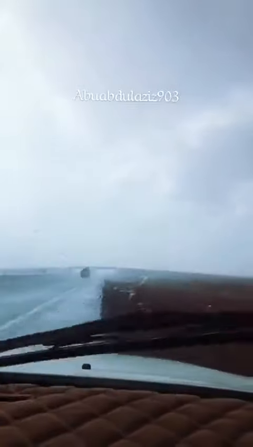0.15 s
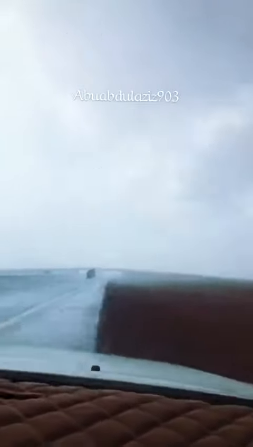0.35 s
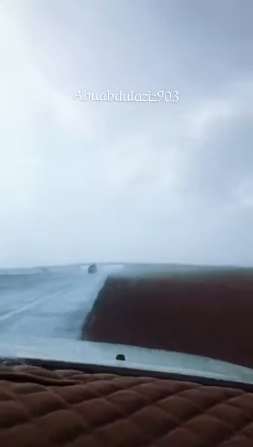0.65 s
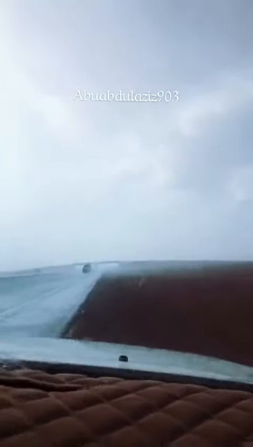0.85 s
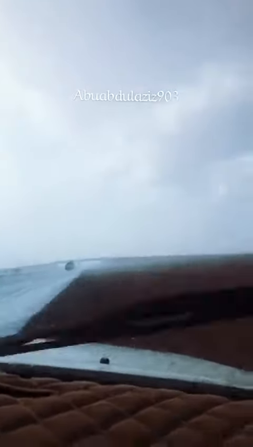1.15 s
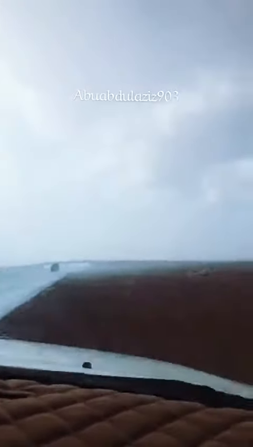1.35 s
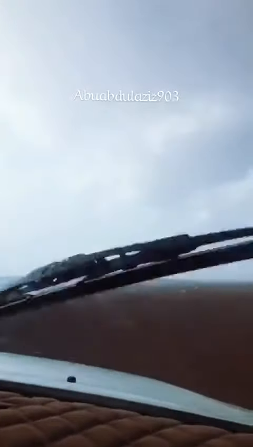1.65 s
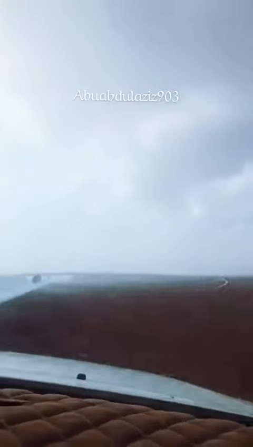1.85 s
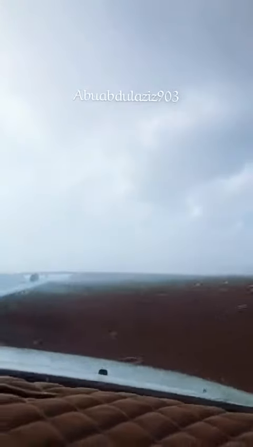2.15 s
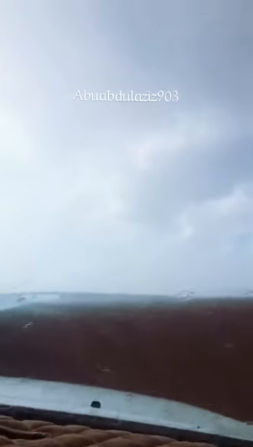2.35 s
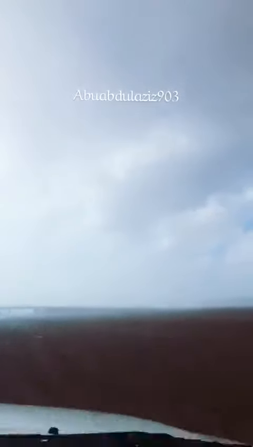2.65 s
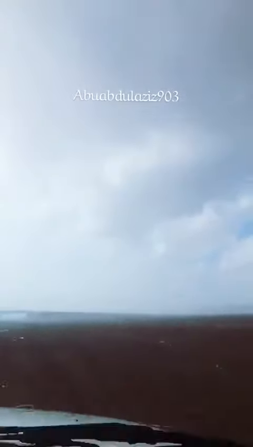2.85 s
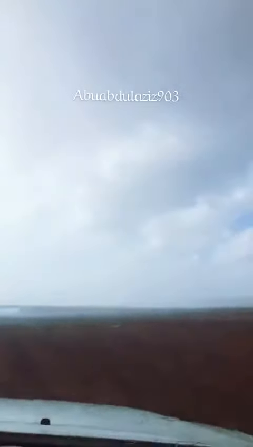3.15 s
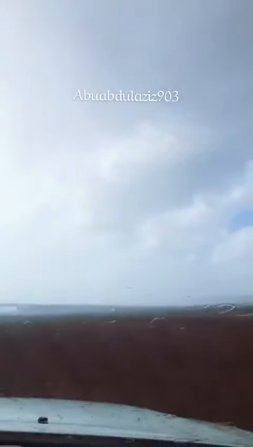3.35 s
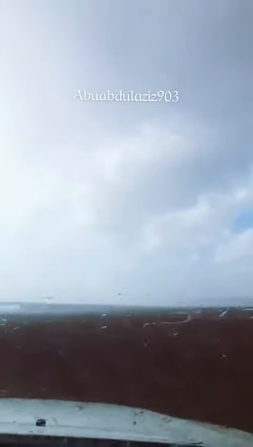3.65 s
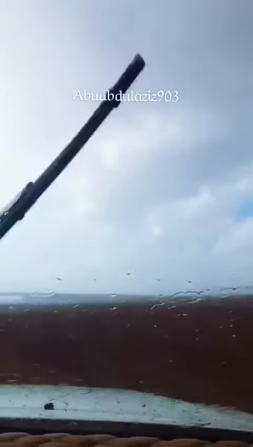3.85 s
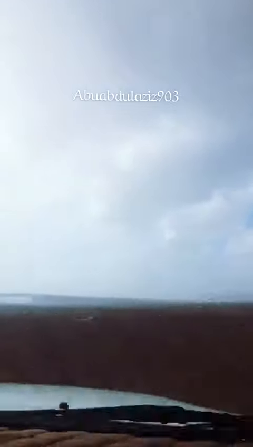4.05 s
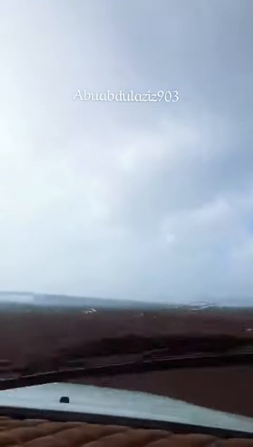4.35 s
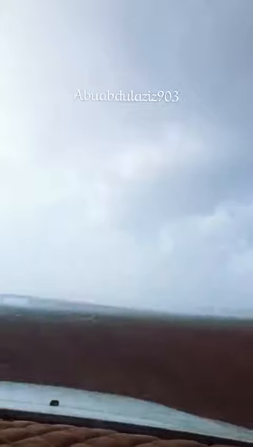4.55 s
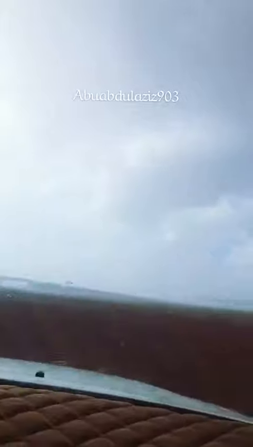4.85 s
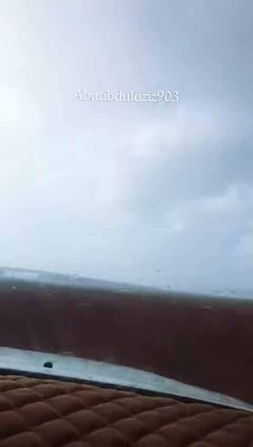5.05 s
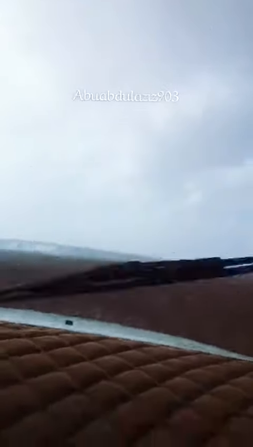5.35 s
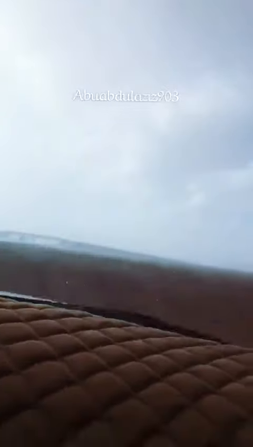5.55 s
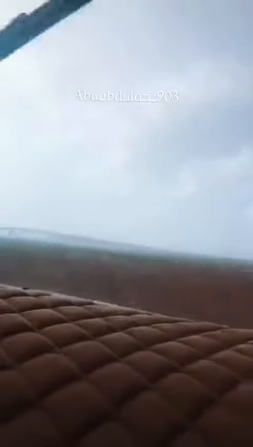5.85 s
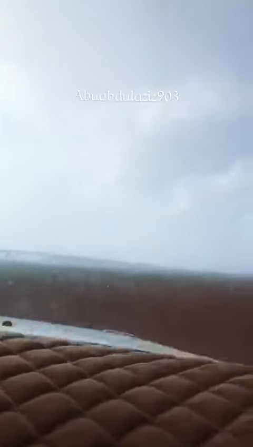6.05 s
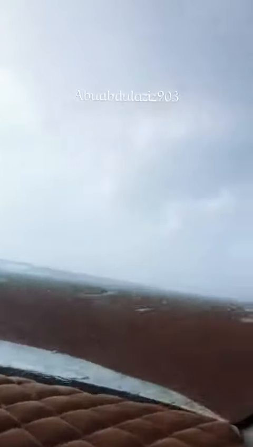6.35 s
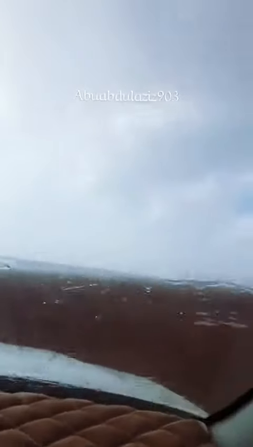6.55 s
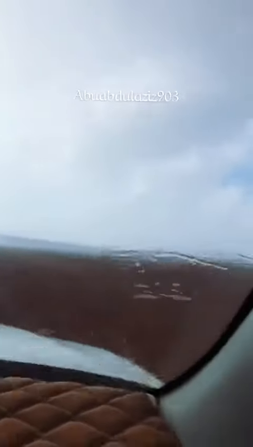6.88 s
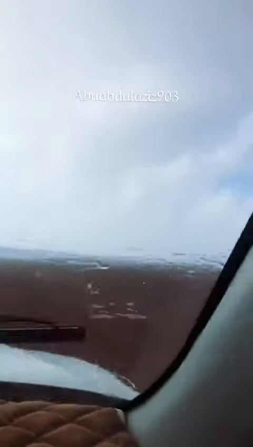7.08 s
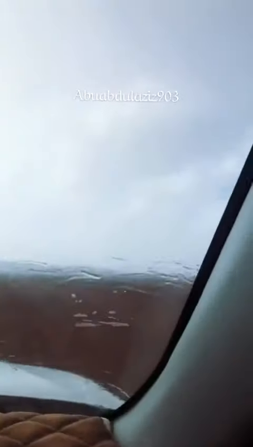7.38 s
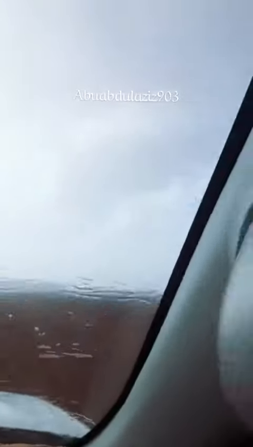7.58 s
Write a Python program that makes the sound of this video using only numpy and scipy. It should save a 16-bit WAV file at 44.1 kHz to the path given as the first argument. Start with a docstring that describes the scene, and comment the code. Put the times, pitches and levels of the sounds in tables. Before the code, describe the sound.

Inside a moving car, hard ice taps and dull panel thuds scatter over hissing rain, wiper thumps and a lumpy bass rumble.

```python
"""Inside a car in rain and hail: rough ground first, smoother from about 3 s, with one 0.04 s dropout near 2 s.
Throughout, hailstones crack on the windshield (dispersed bending waves with echoes) and thud in the panels.
Stones knock on the roof and wipers thump: pushes that ring panel modes. Drops tick and merge into a wash.
Under them, shaped noises give the tyre roar, spray hiss and a lumpy low rumble that follows the ground."""
import sys
import numpy as np
from scipy import signal
from scipy.fft import rfft, irfft
from scipy.io import wavfile
from scipy.ndimage import uniform_filter1d

SR = 44100
rng = np.random.default_rng(int(sys.argv[2]) if len(sys.argv) > 2 else 0)


def generate_wav(sig):
    """Save sig (samples, or channels by samples) to the path in sys.argv[1] as 16-bit PCM at SR."""
    pcm = np.round(np.clip(np.atleast_2d(sig).T, -1, 1) * 32767).astype(np.int16)
    wavfile.write(sys.argv[1], SR, pcm)


N = 340216
TIME = np.arange(N) / SR


def amp(db):
    """Decibels to gain."""
    return 10 ** (np.asarray(db) / 20)


def unit(x):
    """Scales to rms 1."""
    return x / np.sqrt(np.mean(x ** 2) + 1e-20)


def decay(t, t60_s):
    """Exponential decay by 60 dB in t60_s."""
    return np.exp(-np.log(1000) * t / t60_s)


def read(points, hz):
    """Reads a spectrum on a log-frequency axis."""
    f, value = np.transpose(points)
    return np.interp(np.log(hz + 1), np.log(f + 1), value)


def curve(table):
    """A table of (t/s, level/dB) as dB over time."""
    return np.interp(TIME, *np.transpose(table))


def add(mix, s, sound):
    """Mixes a sound in at time s."""
    part = mix[max(round(s * SR), 0):][:len(sound)]
    part += sound[:len(part)]


def bins(size):
    """Frequencies in Hz of a spectrum of this many samples."""
    return np.fft.rfftfreq(size, 1 / SR)


def noise(spectrum):
    """Noise of rms 1 with the given spectrum."""
    white = rfft(rng.standard_normal(N))
    return unit(irfft(white * amp(read(spectrum, bins(N))), N))


def colour(x, gain_db):
    """Causal filter with the given gain on an even frequency grid: attacks stay sharp."""
    both_sides_db = np.r_[gain_db, gain_db[-2:0:-1]]
    log_gain = np.log(amp(np.maximum(both_sides_db, -100)))
    taps = np.fft.ifft(np.exp(np.conj(signal.hilbert(log_gain)))).real  # minimum phase
    return signal.fftconvolve(x, taps)[:len(x)]


def drop_sizes(per_s, spread_db):
    """Drops at random samples, gains spread upwards exponentially in dB."""
    sizes = amp(spread_db * np.minimum(rng.exponential(1, N), 4))
    return sizes * (rng.random(N) < per_s / SR)


# windshield resonances: f/Hz, width/Hz, lift/dB
PANE_MODES = [(3960, 110, 3.3), (5260, 110, 3), (8680, 200, 3), (9090, 80, 3.5), (10650, 200, 2.5),
              (10930, 150, 2)]


def pane_db(hz):
    """The lift that the windshield's resonances give to what lands on it."""
    return sum(db / (1 + (2 * (hz - f) / width) ** 2) for f, width, db in PANE_MODES)


def spot_db(hz, spot_hz, lift_db, octaves):
    """Each spot of the glass favours one band."""
    return lift_db / (1 + (np.log2((hz + 1) / spot_hz) / octaves) ** 2)


def strike(travel_s, rim_db, rim_t60_s, cabin_db, cabin_t60_s, size=4096):
    """One blow on glass: a bending wave whose treble arrives first, echoes from the rim, then the cabin."""
    t, hz = np.arange(size) / SR, bins(size)
    # delay goes as 1 / sqrt(f); travel_s is the delay at 4 kHz
    wave = np.exp(-4j * np.pi * travel_s * np.sqrt(4000 * hz))
    wave = wave * amp(read([(700, -6), (3000, 0)], hz))  # slow low waves radiate poorly
    late = np.maximum(t - travel_s, 0)
    rim, cabin = rng.standard_normal((2, size)) * (1 - np.exp(-late / 0.0016))
    rim = rim * amp(-60 * late / rim_t60_s)
    cabin = cabin * amp(-60 * late / cabin_t60_s)
    echoes = (amp(rim_db) * unit(rim) + amp(cabin_db) * unit(cabin)) / np.sqrt(size)
    echo_tone_db = read([(1200, 2.3), (3500, 4.3), (9000, 1.1)], hz)
    return irfft(wave + rfft(echoes) * amp(echo_tone_db))


STONE_DB = -32.5  # level at force 0 dB
TRAVEL_S, TRAVEL_BY_ECHO = .0012, 0.415  # delay at echo 0 dB; its growth, dB per dB
LOW_RING_DB, LOW_RING_SLOPE = -9, 0.4  # low ring at force 0 dB; its loss with force, dB per dB
# colour of a blow on the glass: f/Hz, gain/dB
GLASS_TONE = [(200, 22), (500, -22.5), (1000, 8.5), (1600, 11.5), (2100, 5), (2900, 5), (3900, 3.5),
              (5200, 6), (7000, 7.5), (9000, 2.5), (11000, 3), (12000, -7)]


def hailstone(force_db, crack_db, ring_hz, echo_db=-4):
    """One stone on the windshield: hard ones crack, far ones blur into their echoes."""
    hz = bins(size=1024)
    travel_s = TRAVEL_S * amp(TRAVEL_BY_ECHO * echo_db)
    blow = strike(travel_s, rim_db=echo_db, rim_t60_s=.025, cabin_db=echo_db - 7, cabin_t60_s=.07)
    low_ring_db = LOW_RING_DB - LOW_RING_SLOPE * force_db
    hardness_db = read([(1300, low_ring_db), (2600, 0), (4200, 0), (7500, crack_db)], hz)
    ring_lift_db = spot_db(hz, ring_hz, lift_db=5.5, octaves=0.23)
    tone_db = read(GLASS_TONE, hz) + pane_db(hz) + hardness_db + ring_lift_db
    return amp(STONE_DB + force_db) * colour(unit(blow), tone_db)


# big stones: t/s, force/dB, crack lift/dB (hardness), spot ring f/Hz, rim echoes/dB (low: near hit)
BIG_STONES = [(.027, -4.5, -10.5, 4370, -0.5), (0.0839, -4.5, -10, 4900, -1), (0.183, -12, -2.5, 3500, 1.5),
              (0.2621, -3, -13, 2920, -5.5), (0.2954, -9, -9.5, 2670, -6.5), (0.456, -15, -9, 3370, -4),
              (0.6435, -13.5, -26, 4890, 3), (0.704, -9, -5, 3070, -6), (0.723, -17, -16, 2800, -7.5),
              (1.0597, -17, -4, 4500, -4), (1.0927, -10.5, -9, 2800, -2.5),
              (1.1431, -3.4, -12.5, 2600, -2.5), (1.3313, -7, -2, 3740, -3.5), (1.347, -18, -6, 4500, 0),
              (1.3555, 6, -2.5, 4070, 4), (1.566, 3, -5.5, 2760, -9.5), (1.5798, -7.5, -15, 3290, 3),
              (1.632, -24, 2, 3600, -4), (1.6593, -9.5, -24, 3140, -1), (1.729, -13.5, -3, 3440, -2.5),
              (1.894, -13.5, -4.5, 3130, -2), (1.9846, -4, -7, 3240, 1), (2.242, -11, -6, 3400, -6),
              (2.284, -13.5, -4, 4310, -2.5), (2.3689, -11, -2.5, 3320, -4), (2.5747, -16, -6, 3170, -2.5),
              (2.6292, -18, -5, 3500, -6), (2.986, -8, -6, 4700, 0), (3.0567, -16, -2, 3400, -6),
              (3.1053, -15.5, -21, 3280, -4.5), (3.735, -19, 4, 5050, -7), (3.8167, -18, 0, 4400, -3),
              (3.8412, -20.5, -5, 4100, -3), (3.9426, -24, 7, 3690, -3), (4.203, -16, -4, 2770, 0.5),
              (4.358, -17, -6, 3800, 0), (4.7879, -9, -9, 3040, -6), (4.998, -16.5, -21, 3170, -2.5),
              (5.1638, -4.5, -4.5, 3400, -1), (5.2606, -29, -14, 3000, -9), (5.5159, -14, -14, 2560, -2),
              (5.654, -16, -4, 4640, -2), (5.7236, -10, -9, 3850, -4.5), (5.7566, -13.5, 3, 3490, -5.5),
              (5.8741, -11.5, -5.5, 2970, -4.5), (6.045, -18, 8, 3880, -4), (6.3031, -19, -11, 3000, -3),
              (6.4322, -4.5, -12, 2960, -4.5), (6.6722, -4, -13, 3180, -1), (6.7196, -6.5, -19, 4760, -7),
              (6.7404, -5.5, -10.5, 2980, -6.5), (7.105, -11, -11, 2660, -4), (7.176, -9, -5.5, 2530, 1),
              (7.1994, -17, -7, 2600, -2.5), (7.243, -14.5, -6, 3460, -5.5), (7.445, -17, -17, 3700, -1.5),
              (7.5347, -14.5, -13, 3700, -6.5)]


def hail():
    """Each big stone strikes the glass and thuds in the panels around it."""
    out = np.zeros(N)
    for s, force_db, *stone in BIG_STONES:
        add(out, s, hailstone(force_db, *stone))
        add(out, s, knock(force_db - 40, centre_hz=600, spread_oct=1, t60_s=0.062))
    return out


def small_hail(force_db=-20, crack_db=-5.5, spread_db=3.5, lowest_hz=2600, highest_hz=4600, count=30):
    """Small stones land anywhere on the glass, one at a random moment of each equal slot."""
    out = np.zeros(N)
    for k, (when, size, hard, spot) in enumerate(rng.random((count, 4))):
        force = force_db + spread_db * (2 * size - 1)
        crack = crack_db + spread_db * (2 * hard - 1)
        ring_hz = lowest_hz + spot * (highest_hz - lowest_hz)
        add(out, (k + when) / count * N / SR, hailstone(force, crack, ring_hz))
    return out


# modes of the roof and cowl panels: f/Hz, level/dB, t60/s
PANEL_MODES = [(207.5, -14, 0.055), (304, -0.5, 0.15), (380, 0.5, 0.057), (440, 3.5, 0.078),
               (517, -1, 0.065), (662, -8.5, 0.05), (750, 4.5, 0.014), (872, -1, 0.029), (997, -9, 0.051),
               (1207, 3.5, 0.024), (1380, -24, 0.035), (1630, 5, 0.024), (1836, -11, 0.066),
               (1916, -0.5, 0.043), (2440, -5, 0.028), (2940, 16, 0.019)]


def panels(push, centre_hz, spread_oct, edge_db=7, thud_db=-2, thud_t60_s=.012, count=5):
    """A push gives a dead thud and rings the panel modes around its centre; rms 1."""
    t = np.arange(len(push) // 2) / SR
    # neighbouring panels ring at nearby pitches
    hz, mode_db, mode_t60_s = np.transpose(PANEL_MODES * count)[:, :, None]
    pitch_hz = hz * rng.uniform(.87, 1.13, hz.shape)

    def off_centre_db(f):
        return -edge_db * (np.log2(f / centre_hz) / spread_oct) ** 2

    late = np.maximum(t - rng.uniform(0, 0.00206, hz.shape), 0)  # each takes its own path
    modes = np.sin(2 * np.pi * pitch_hz * late) * decay(late, mode_t60_s)
    ring = (amp(mode_db + off_centre_db(pitch_hz)) * modes).sum(0)
    burst = rng.standard_normal(len(t)) * decay(t, thud_t60_s)
    thud = colour(burst, np.maximum(off_centre_db(bins(size=2048) + 1), -50))
    body = unit(ring) + amp(thud_db) * unit(thud)
    return unit(signal.fftconvolve(push, body)[:len(push)])


def knock(level_db, centre_hz, spread_oct, t60_s, rattle_db=5, size=8192):
    """A dull blow on the panels: an impulse and a short rattle of decaying noise."""
    t = np.arange(size) / SR
    rattle = unit(rng.standard_normal(size) * decay(t, t60_s)) / np.sqrt(size)
    push = amp(rattle_db) * rattle + (t == 0)
    return amp(level_db) * panels(push, centre_hz, spread_oct)


# stones on the roof: t/s, level/dB, centre f/Hz, spread/octaves, rattle t60/s
ROOF_KNOCKS = [(0.0848, -36, 1600, 0.53, .04), (.24, -43, 796, 0.85, .054), (1.282, -40, 950, 0.64, 0.032),
               (1.359, -36.5, 600, 1.14, .099), (1.569, -37.5, 910, 0.79, .094),
               (2.648, -48.5, 750, .24, 0.035), (2.698, -35.5, 845, 1, 0.068),
               (2.987, -43, 600, 0.47, 0.14), (4.072, -41.5, 930, 0.71, 0.15),
               (4.204, -42, 2240, 0.65, 0.087), (4.277, -46.5, 1900, 0.63, 0.086),
               (4.2812, -33.5, 553, 0.58, 0.082), (4.305, -46, 796, 0.41, .088),
               (4.771, -53, 790, 0.5, 0.037), (5.462, -47.5, 880, 0.4, .07), (6.334, -36.5, 212, .23, .05),
               (6.744, -44.5, 614, 0.78, 0.08), (7.159, -43, 1970, 0.48, 0.045),
               (7.166, -41.5, 800, .9, 0.26), (7.223, -41.5, 300, 0.63, .05),
               (7.2433, -39.5, 690, 0.53, .035), (7.4603, -40, 1180, 0.53, 0.026)]


def knocks():
    """Stones knock dully on the roof."""
    out = np.zeros(N)
    for s, *blow in ROOF_KNOCKS:
        add(out, s, knock(*blow))
    return out


# blades turning over: t/s, level/dB, centre f/Hz, spread/octaves, length/s
WIPER_TURNS = [(.38, -41.5, 800, 1, 0.042), (1.171, -38, 490, 0.61, 0.047),
               (3.951, -36.5, 440, 0.83, 0.057), (4.718, -40, 225, 0.64, 0.062),
               (5.348, -43.5, 477, 0.8, 0.069), (5.842, -43.5, 810, 1.1, 0.067)]


def wipers(size=8192):
    """The rubber blades roll over and drag: a push that swells and fades, heard through the cowl panels."""
    t, out = np.arange(size) / SR, np.zeros(N)
    for s, level_db, centre_hz, spread_oct, length_s in WIPER_TURNS:
        swell = np.sin(np.pi * np.minimum(t / length_s, 1))
        drag = swell * rng.standard_normal(size)
        add(out, s, amp(level_db) * panels(drag, centre_hz, spread_oct))
    return out


def speckled(x, depth_db, size=128):
    """Countless droplets crowd into brief clusters, each at its own pitch."""
    z = signal.stft(x, nperseg=size)[2]
    grain = uniform_filter1d(rng.standard_normal(z.shape), size=4, axis=0)
    clusters = unit(uniform_filter1d(grain, size=4, axis=1))
    return unit(signal.istft(z * amp(depth_db * clusters), nperseg=size)[1][:N])


# fine rain, before the drop and wash gains: t/s, level/dB
RAIN_LEVEL = [(0, -49.5), (.25, -50), (.33, -42), (.53, -47.5), (.69, -44), (1.1, -41.5), (1.24, -46.5),
              (1.36, -38.5), (2, -43.5), (2.67, -42), (2.8, -44.5), (3.1, -39), (3.55, -42), (3.85, -39),
              (4.13, -41), (4.45, -42.5), (4.56, -41), (4.79, -41.5), (5.2, -45), (5.4, -45), (5.9, -43.5),
              (6.35, -44), (6.55, -46), (6.75, -44.5), (7.07, -49), (7.2, -42.5), (7.47, -45.5),
              (7.71, -44.5)]
# colour of the patter: f/Hz, level/dB
PATTER_TONE = [(900, -11), (1800, 0.5), (2200, -1), (2800, 3), (3600, 2.5), (4600, -0.9), (6000, -1),
               (8000, -4.5), (10800, -8), (12000, -12.5)]


def rain(per_s=800, spread_db=4.5, drops_db=-4.0, wash_db=-1.58, sheets_db=2.07, count=24):
    """Small drops tick all over the glass, each spot with its own colour; the finest merge into a wash."""
    sizes = drop_sizes(per_s, spread_db)
    spot, drops, hz = rng.integers(0, count, N), np.zeros(N), bins(size=1024)
    for k, ring_hz in enumerate(np.geomspace(1400, 11500, count)):
        travel_s = rng.uniform(.0003, .0012)
        tick = strike(travel_s, rim_db=-6, rim_t60_s=.018, cabin_db=-13, cabin_t60_s=.06)
        ring_lift_db = spot_db(hz, ring_hz, lift_db=24.0, octaves=0.76)
        tick = colour(tick, read(PATTER_TONE, hz) + pane_db(hz) + ring_lift_db)
        drops += signal.oaconvolve(sizes * (spot == k), tick)[:N]
    wash = unit(colour(speckled(noise(PATTER_TONE), depth_db=2.0), pane_db(hz)))
    # the rain arrives in quick uneven sheets
    sheets = amp(sheets_db * noise([(0, 60), (12, -51), (30, -26), (100, -80)]))
    patter = amp(drops_db) * unit(drops) + amp(wash_db) * wash
    return amp(curve(RAIN_LEVEL)) * sheets * patter


def steadied(x, seconds):
    """Evens out the slow swells of a noise and leaves its quick lumps."""
    power = np.abs(uniform_filter1d(x ** 2, int(seconds * SR)))
    return x / np.sqrt(power + 1e-6)


# bumps and lulls: crest t/s, added shaking/dB, added boom/dB
BUMP_LIFTS = [(.19, -4, 6), (.39, 6.5, 2), (.62, -7, 6.5), (1.97, 0.5, 2.5), (2.24, 3.5, -0.5),
              (3.2, -7.5, 0), (2.69, -3, 2), (3.05, 13, 2), (3.46, 7, -5), (3.68, 7, -2), (3.95, -3, 4.5),
              (4.57, 5.5, 1.5), (4.79, -5, 4.5), (6.83, 6.5, 2), (7.24, -10, 7.5)]
BUMP_S = 0.053  # from the crest until the lift falls to 1/e


def bumps():
    """Single bumps and lulls as Gaussian lifts: shaking dB and boom dB over time."""
    s, shake_lift_db, boom_lift_db = np.transpose(BUMP_LIFTS)
    crests = np.exp(-((TIME - s[:, None]) / BUMP_S) ** 2)
    return shake_lift_db @ crests, boom_lift_db @ crests


# roughness above a smooth road: t/s, level/dB
ROUGHNESS = [(0, -1), (.2, 5), (.92, 4.5), (1.08, 7), (1.45, 8), (1.85, 7), (2.25, 7.5), (2.72, 7.5),
             (2.86, 2), (3.45, 1.5), (3.85, -3.5), (4.28, -0.5), (4.42, -7.5), (4.58, -1.5), (5.2, -2.1),
             (6.3, 1), (6.9, -1), (7.71, 1)]
# f/Hz, level/dB per Hz
SHAKE_TONE = [(8, -8), (20, -0.5), (36, 4.5), (52, -2.5), (70, -9), (130, -80), (600, -110)]
# the springs soak up roughness below SPRINGS_DB; slopes in dB per dB
SPRINGS_DB, SHAKE_BY_GROUND, SHAKE_PAST_SPRINGS = 4.5, 0.54, 2.58


def shake(level_db, ground_db, bump_db):
    """Rough ground and bumps shake the body, faster once past the springs."""
    past_db = np.maximum(ground_db - SPRINGS_DB, 0)
    heave_db = SHAKE_BY_GROUND * ground_db + SHAKE_PAST_SPRINGS * past_db + bump_db
    return amp(level_db + heave_db) * steadied(noise(SHAKE_TONE), 0.21)


# f/Hz, level/dB per Hz
BOOM_TONE = [(30, -64), (56, 4.5), (70, 0), (85, 3.5), (105, -4.5), (135, -10.5), (220, -42), (1200, -100)]


def boom(level_db, ground_db, surge_db, by_ground=0.78):
    """The cabin booms with the ground (dB per dB) and the bumps."""
    return amp(level_db + by_ground * ground_db + surge_db) * steadied(noise(BOOM_TONE), 0.2)


# f/Hz, level/dB per Hz
TYRE_TONE = [(70, -20), (135, 2), (180, -4), (225, -5.5), (280, -11), (350, -16), (500, -21.5),
             (1000, -36.5), (4000, -93)]


def tyres(level_db, ground_db, lift_db, by_ground=0.68, by_bump=0.38):
    """The tyres roar with the ground and the bumps (dB per dB)."""
    follow_db = by_ground * ground_db + by_bump * lift_db
    return amp(level_db + follow_db) * steadied(noise(TYRE_TONE), 0.24)


# water thrown at the body, against its usual level: t/s, level/dB
SPLASH_LEVEL = [(0, 3.5), (.35, 1.5), (.9, 2), (1.4, 3.5), (2, 2.5), (2.6, 2.5), (2.85, 0), (3.6, -1),
                (4.45, 0), (5.3, -2), (5.9, 1), (6.6, 0), (7, 0.5), (7.35, 2.5), (7.71, 0.5)]
# f/Hz, level/dB per Hz
SPRAY_TONE = [(150, -1), (350, -3.5), (520, 5.5), (800, -1), (1400, -3.5), (2100, -12), (4000, -22),
              (12000, -43)]


def spray(level_db):
    """Water thrown up from the wet road hisses."""
    return amp(level_db + curve(SPLASH_LEVEL)) * noise(SPRAY_TONE)


def road():
    """Body, cabin and tyres follow the same ground and bumps; the spray has its own course."""
    ground_db = curve(ROUGHNESS)
    bump_db, surge_db = bumps()
    rumble = shake(-25.0, ground_db, bump_db) + boom(-26.0, ground_db, surge_db)
    return rumble + tyres(-35.0, ground_db, bump_db + surge_db) + spray(-46.5)


def roof(per_s=170, spread_db=3, level_db=-50.0, ring_t60_s=0.078, size=2048, count=40):
    """Drops drum faintly all over the body, each spot at its own pitch, muffled by the lining."""
    t, out = np.arange(size) / SR, np.zeros(N)
    sizes = drop_sizes(per_s, spread_db)
    spot = rng.integers(0, count, N)
    for k, hz in enumerate(np.linspace(350, 2400, count)):
        ring = amp(read(SPRAY_TONE, hz)) * np.sin(2 * np.pi * hz * t) * decay(t, ring_t60_s)
        out += signal.oaconvolve(sizes * (spot == k), ring)[:N]
    return amp(level_db + curve(SPLASH_LEVEL)) * unit(out)


def scene():
    """Everything as heard from the front seat."""
    stones = hail() + small_hail() + knocks()
    return (stones + wipers() + rain() + road() + roof())[None]


# dropout: start t/s, end t/s
DROPOUT = (2.062, 2.1)
EDGE_HZ = 12000


def record(dry):
    """The sound drops by 50 dB for an instant, the highest peaks are rounded off, then the band limit."""
    live = 1. * ((TIME < DROPOUT[0]) | (TIME > DROPOUT[1]))
    live = uniform_filter1d(uniform_filter1d(live, size=100), size=100)  # short fades
    rounded = dry / (1 + (dry / .88) ** 8) ** (1 / 8)
    lowpass = signal.firwin(301, EDGE_HZ, window=("kaiser", 8), fs=SR)
    return signal.oaconvolve(rounded * np.maximum(live, amp(-50)), lowpass[None], "same")


dry = scene()
out = record(dry)
generate_wav(out)
```